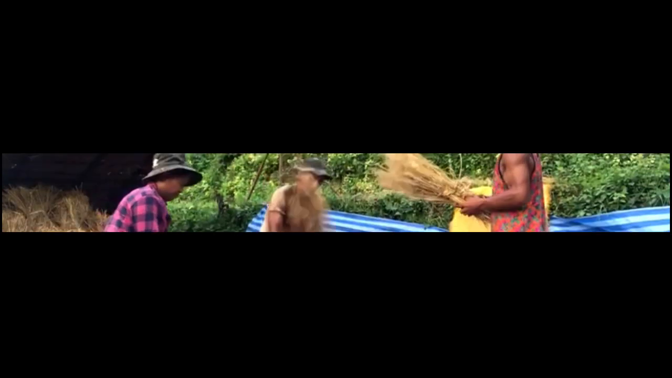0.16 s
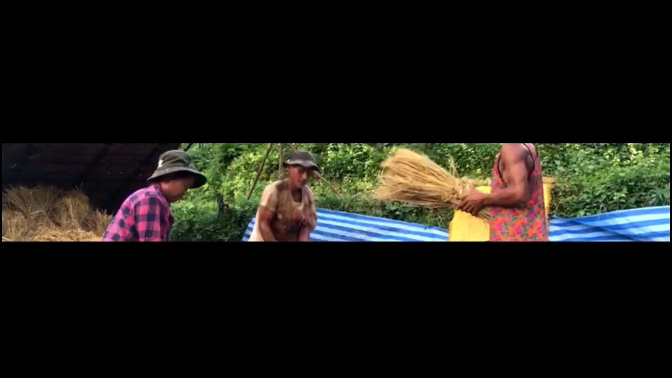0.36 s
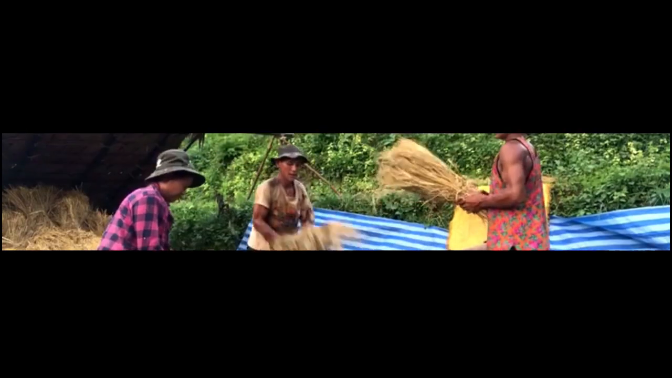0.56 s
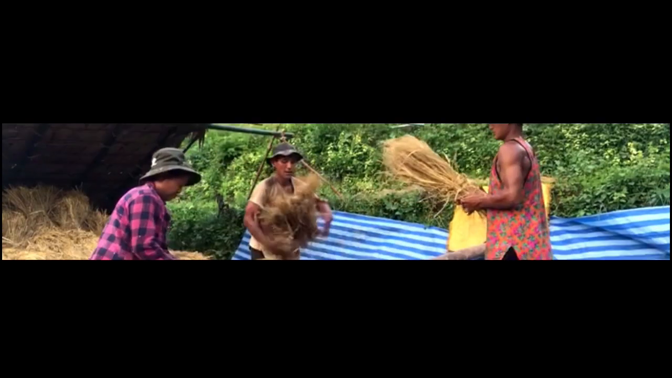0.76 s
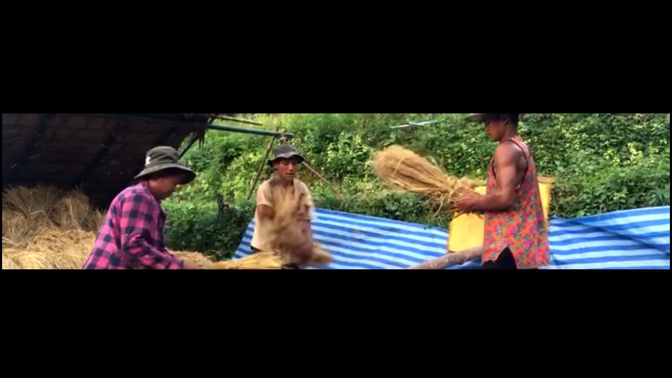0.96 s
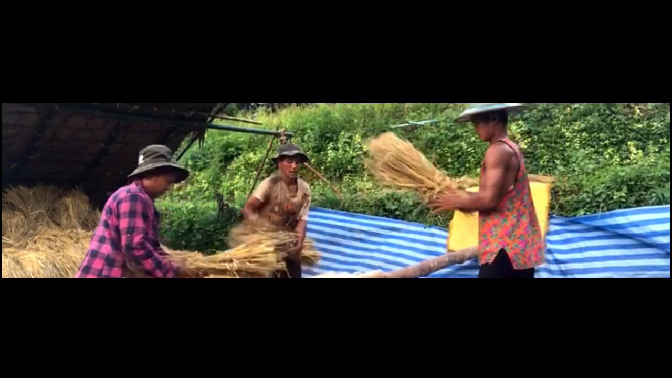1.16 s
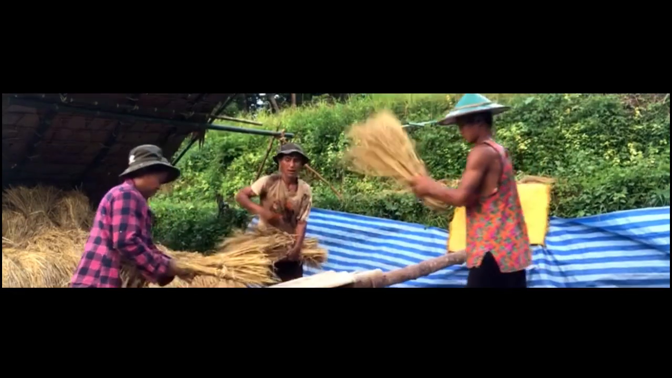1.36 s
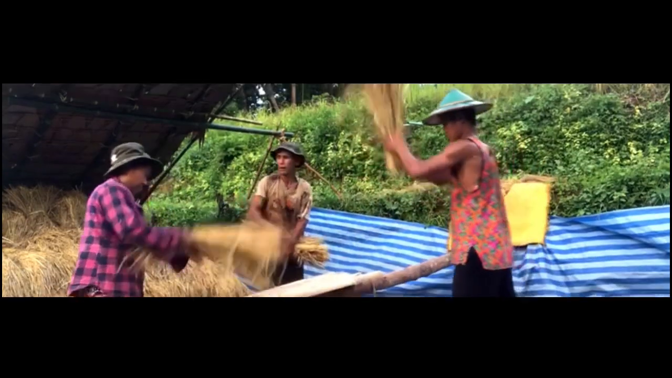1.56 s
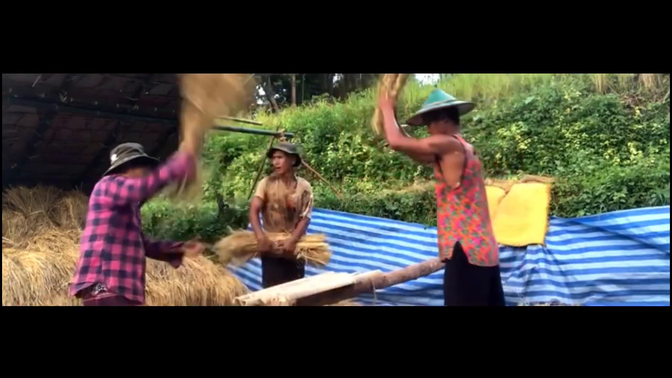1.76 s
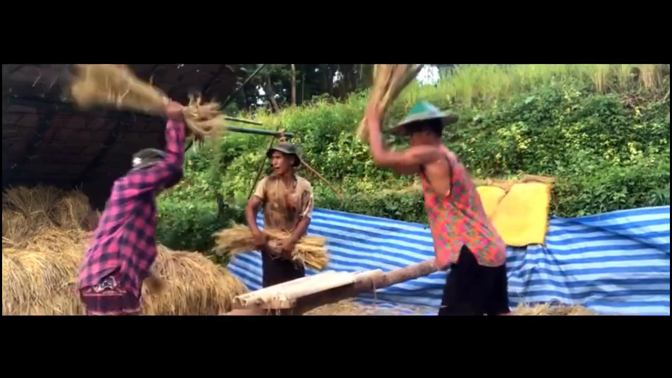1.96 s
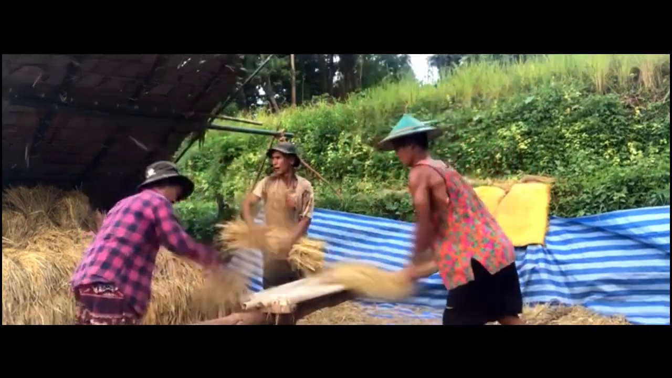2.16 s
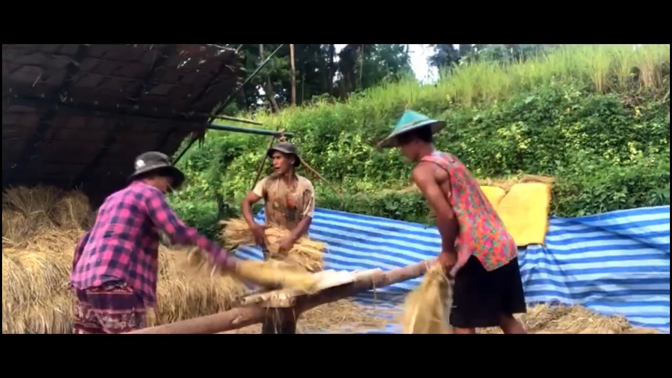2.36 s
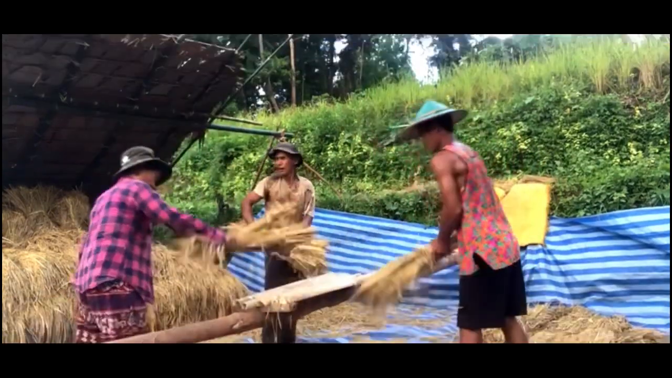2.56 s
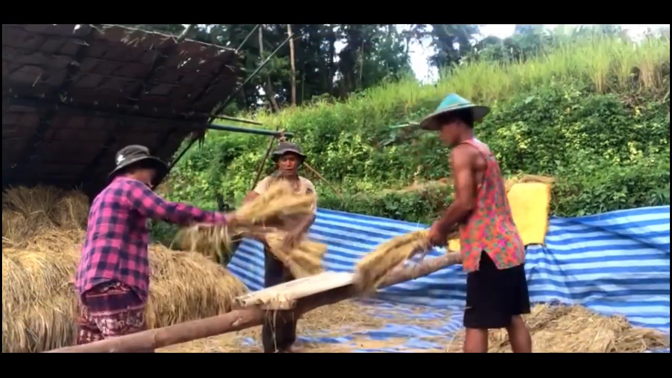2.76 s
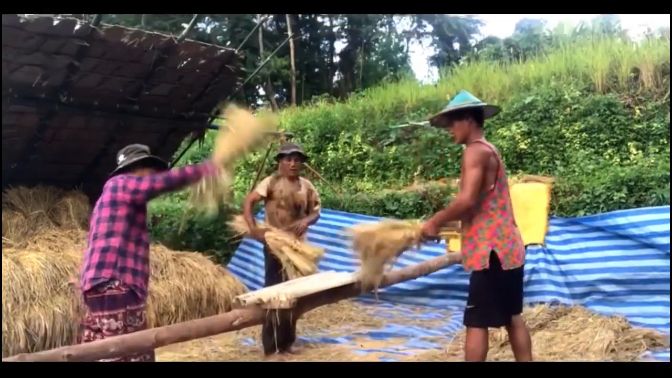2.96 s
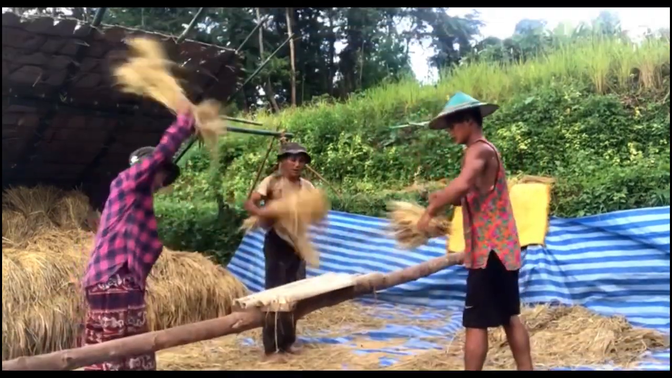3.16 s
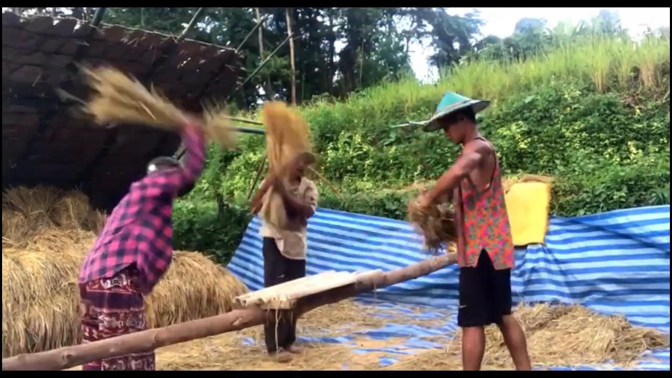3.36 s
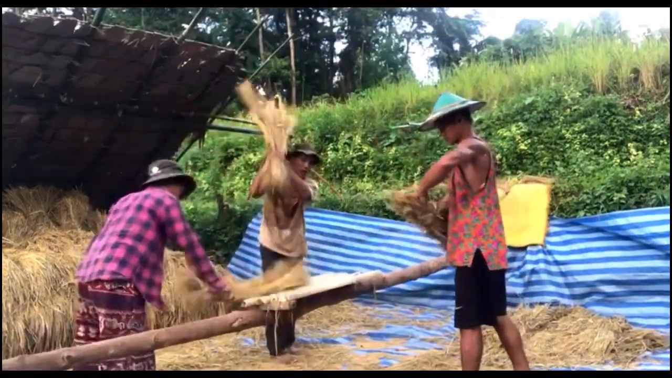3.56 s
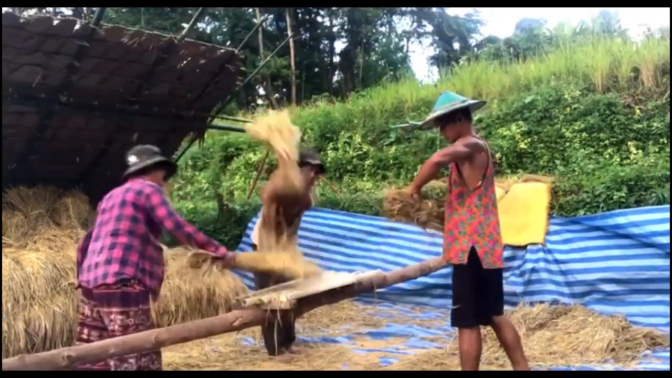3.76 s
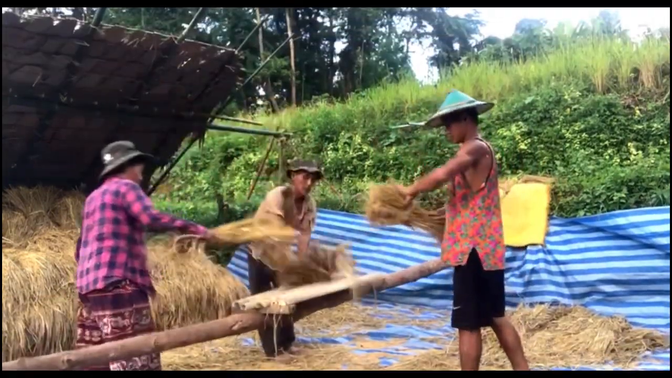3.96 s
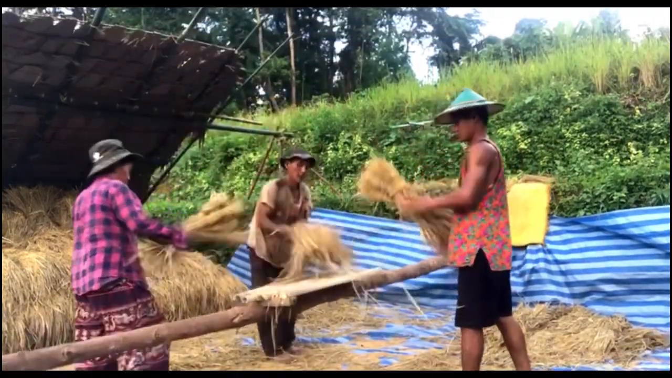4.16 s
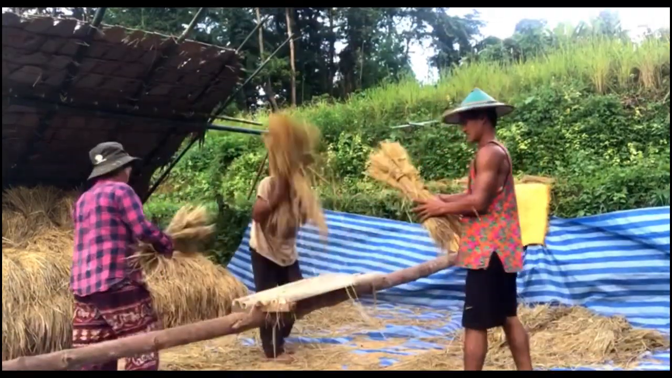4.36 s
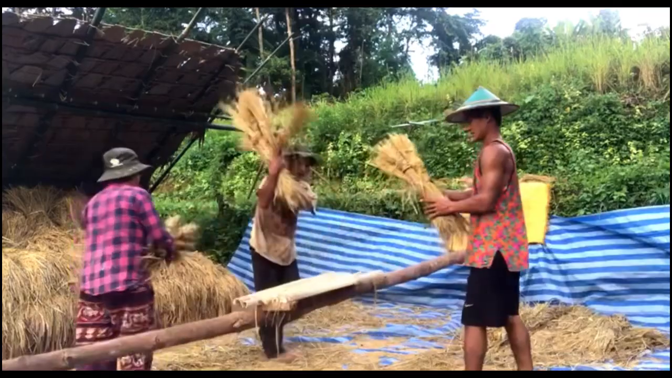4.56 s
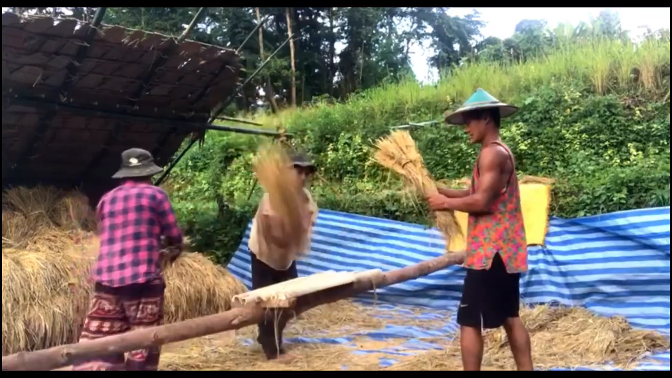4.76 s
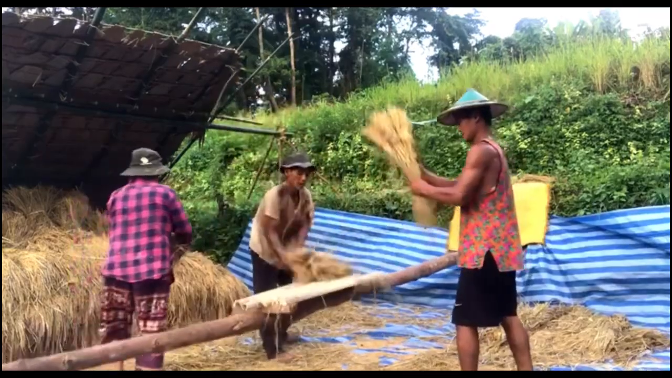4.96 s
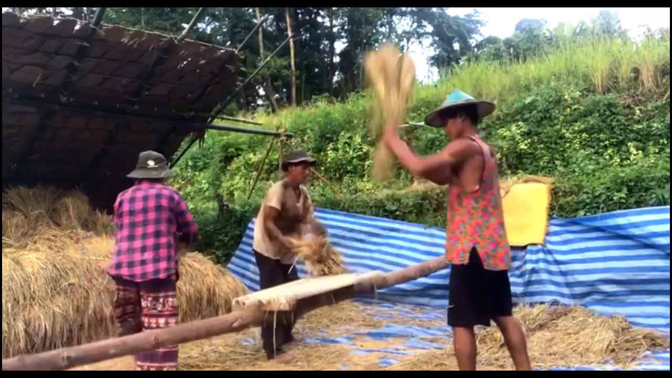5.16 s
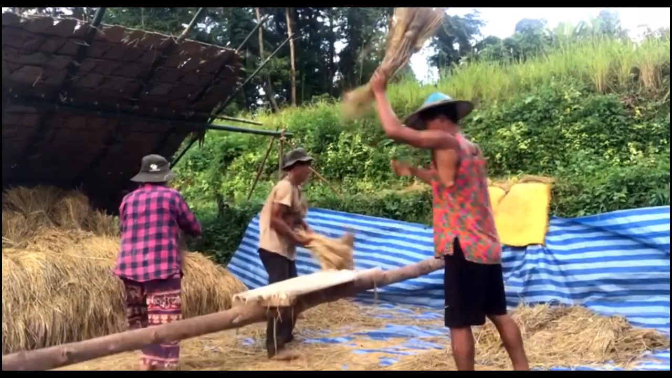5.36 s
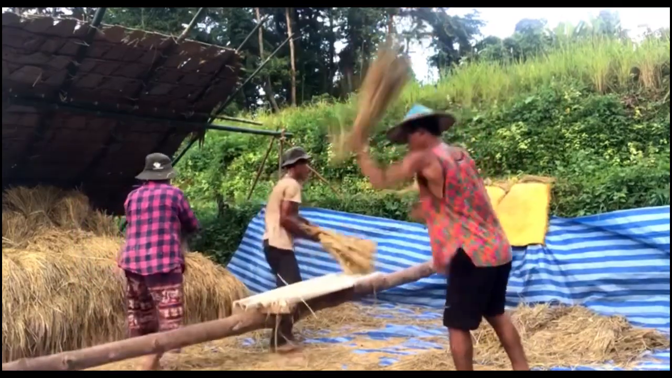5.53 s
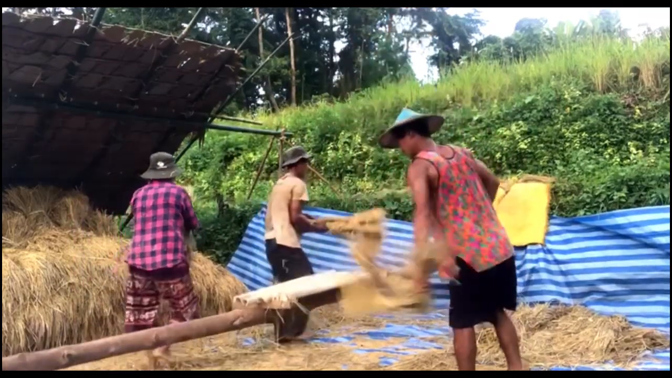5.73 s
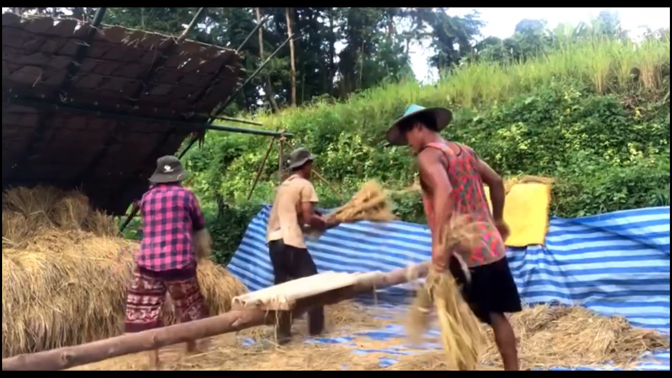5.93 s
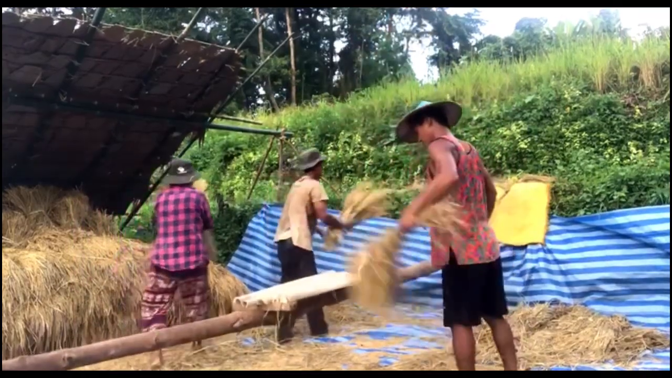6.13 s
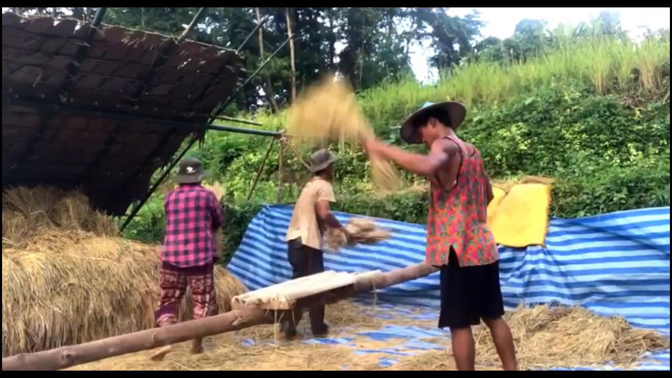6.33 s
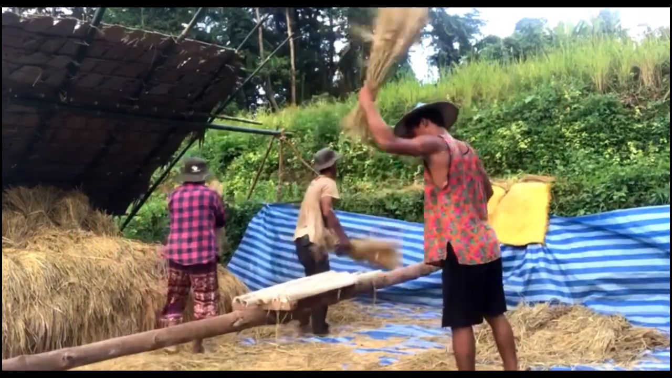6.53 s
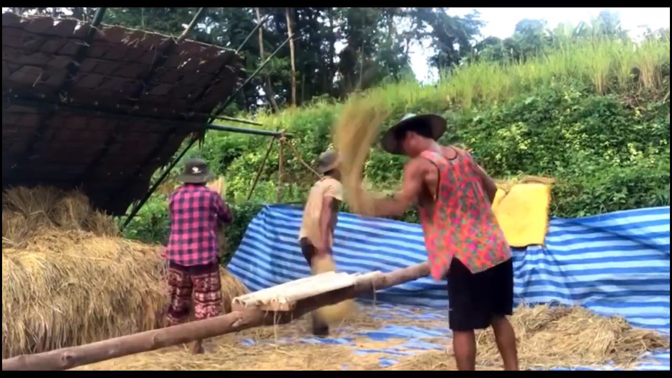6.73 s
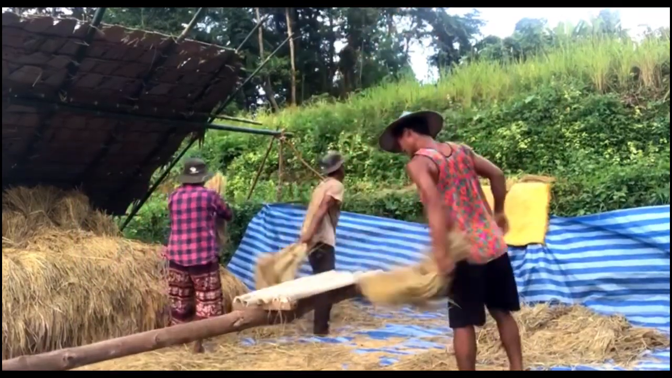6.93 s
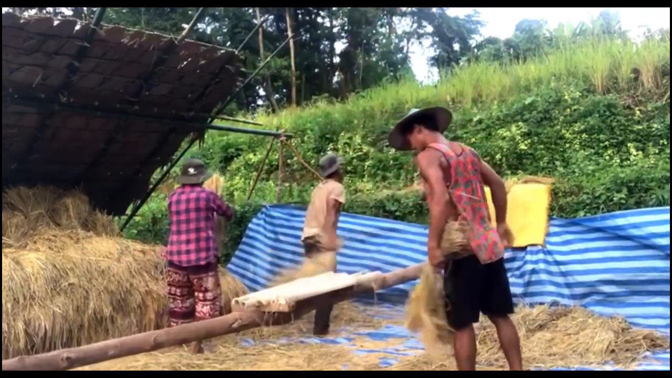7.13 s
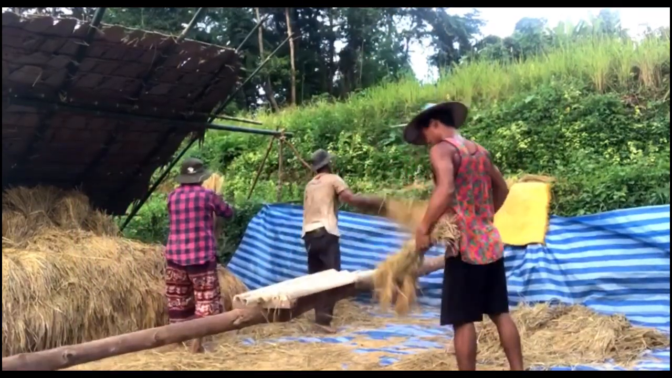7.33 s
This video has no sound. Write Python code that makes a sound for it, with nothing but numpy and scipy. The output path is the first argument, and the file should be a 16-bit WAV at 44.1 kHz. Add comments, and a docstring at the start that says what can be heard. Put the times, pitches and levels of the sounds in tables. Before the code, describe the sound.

Close outdoor phone pickup of hand threshing. Dry bundles of rice straw whack a plank on poles about eight times, unevenly, including a quick pair near two seconds. Each is a bright, splashy slap with a short woody knock, low pole shudder and pattering grain. Straw rustles, crunches and snaps between blows; high insects buzz faintly, with brief distant whistles around three seconds.

```python
"""Beating rice straw by hand

Bundles of rice straw are beaten on a plank laid over poles, in a field a few metres from a phone.
Each blow is a crowd of stalks slapping within milliseconds (noise in bands that fade at their own pace),
then the plank's knock (ringing modes) and the poles' shudder (low noise and one jolt).
Between blows straw rustles and crunches (flickering crackle) and snaps (short rung bursts), insects buzz
at a high pitch, a few faint whistles come from afar and the field hums faintly."""
import sys
import numpy as np
from scipy import signal
from scipy.fft import rfft, irfft, next_fast_len
from scipy.io import wavfile
from scipy.ndimage import uniform_filter1d

SR = 44100
rng = np.random.default_rng(int(sys.argv[2]) if len(sys.argv) > 2 else 0)


def to_wav(sig):
    """Store sig (one row per channel, or 1-D mono) as 16-bit WAV at the path in sys.argv[1].

    Samples outside -1..1 are clipped; the rate is SR.
    """
    pcm = np.clip(np.atleast_2d(sig), -1, 1) * 32767
    pcm = np.round(pcm).astype(np.int16)
    wavfile.write(sys.argv[1], SR, pcm.T)  # frames by channels


def to_linear_factor(level_db):
    """Convert decibel levels (scalar or array-like) to linear amplitude factors."""
    exponent = np.asarray(level_db, float) / 20
    return 10 ** exponent


N = 325878
T = np.arange(N) / SR

# Blows of a bundle on the plank. Each row: start in seconds, level in dB (the first 10 ms lie 8 dB under it
# in rms), treble in dB (-12.5 leaves the slap's colour alone), slap t60 in seconds before each band's
# share, pattering tail in dB relative to the slap.
BLOW_TIMES = [(0.249, -5.5, -10, 0.063, -26.5), (2.1993, -1.5, -8, 0.055, -25),
              (2.2589, -2, -10, 0.053, -27.5), (3.6123, -0.5, -10.5, 0.055, -27),
              (3.9895, -0.5, -12, 0.055, -28), (4.893, -5, -8.5, 0.069, -24.5),
              (5.7138, -1.5, -12, 0.068, -22), (6.2747, -29, -9, 0.042, -17.5),
              (6.877, -3, -11, 0.06, -20.5)]
# How busily the straw is handled. Each row: time in seconds, rustle level in dB before flicker.
HANDLING_LEVELS = [(0, -57), (.12, -47.5), (.45, -53.5), (.65, -49), (1.1, -55), (1.4, -54), (1.7, -52),
                   (1.85, -59), (2.1, -61), (2.35, -47.5), (2.65, -51), (3.1, -53.5), (3.2, -68),
                   (3.5, -80), (3.7, -48.5), (4.05, -48.5), (4.4, -56), (4.8, -51), (5.05, -51), (5.3, -60),
                   (5.6, -62), (5.85, -45), (6.15, -45), (6.25, -54.5), (6.5, -50.5), (6.7, -58.5),
                   (7.0, -49), (7.25, -55), (7.39, -60.5)]


def level(x, db):
    """Scale to an rms level."""
    return x * to_linear_factor(db) / np.sqrt(np.mean(x ** 2))


def read(table, hz, column):
    """A table column read on a log-frequency axis."""
    rows = np.array(table)
    return np.interp(np.log(np.maximum(hz, 1)), np.log(rows[:, 0]), rows[:, column])


def colour(x, table):
    """Give a signal the spectrum of (Hz, dB) points."""
    size = next_fast_len(len(x))
    hz = np.arange(size // 2 + 1) * SR / size
    return irfft(rfft(x, size) * to_linear_factor(read(table, hz, column=1)), size)[:len(x)]


def ring(x, hz, t60):
    """One decaying mode: a complex pole whose imaginary part swings and fades."""
    pole = np.exp(2j * np.pi * hz / SR - np.log(1000) / (t60 * SR))
    return signal.lfilter([1], [1, -pole], x).imag


def band(x, hz, width_hz):
    """Two-pole band-pass."""
    b, a = signal.iirpeak(min(hz, 0.45 * SR), hz / width_hz, SR)
    return signal.lfilter(b, a, x)


def walk(rate):
    """Random levels held 1 / rate seconds and smoothed twice; spread near 1."""
    hold = int(SR / rate)
    steps = np.repeat(rng.standard_normal(N // hold + 1), hold)
    return 1.4 * uniform_filter1d(uniform_filter1d(steps, hold), hold)[:N]


def crackle(length, grit_db):
    """Dense tiny contacts, a few bigger than the rest; rms 1."""
    sizes_db = grit_db * np.minimum(rng.exponential(size=length), 5)
    return level(rng.standard_normal(length) * to_linear_factor(sizes_db), 0)


def add(out, s, sound):
    """Mix a sound in at a time in seconds."""
    i = int(s * SR)
    out[i:i + len(sound)] += sound[:N - i]


def straw():
    """Fine rustle and coarser crunch of bundles handled, swung and shaken, both flickering; powers add."""
    # Bundles swung down through the air. Each row: landing in seconds, swing length in seconds,
    # rustle level at landing in dB.
    swings = [(0.252, 0.069, -42), (2.204, .14, -42), (3.613, 0.17, -42.5), (4.002, 0.087, -37),
              (4.915, 0.23, -46), (5.723, 0.14, -36.5), (6.876, 0.14, -43)]
    # Bundles shaken or turned over. Each row: middle in seconds, length in seconds, rustle level in dB,
    # crunch in dB over that rustle.
    shakes = [(0.76, .2, -48.5, -24), (1.004, 0.066, -42, -10), (1.207, 0.41, -50, -22),
              (1.573, 0.15, -47.5, -23), (2.508, 0.073, -50.5, 6), (4.283, 0.072, -46, -5),
              (4.486, 0.12, -58, 6), (5.167, .06, -55, 5.5), (5.373, 0.045, -51.5, -9),
              (5.842, 0.012, -40, -15), (6.307, 0.11, -43, -12), (6.698, 0.0043, -40.5, -10),
              (7.106, 0.079, -45, -4), (7.318, 0.014, -59, 8)]
    # Colour of the fine rustle. Each row: frequency in Hz, level in dB per Hz (relative).
    rustle_colour = [(880, -21), (1500, -6.5), (4470, -1.5), (4970, -4.5), (6150, 0), (10400, -8),
                     (11200, -5.5), (12100, -20), (12500, -32), (16200, -53), (22000, -120)]
    # Colour of the coarse crunch. Each row: frequency in Hz, level in dB per Hz (relative).
    crunch_colour = [(250, -8), (500, -5), (1100, 1), (2000, -7), (3500, -12)]

    busy_db = np.interp(T, *np.array(HANDLING_LEVELS).T)
    rustle_power = to_linear_factor(busy_db) ** 2
    # crunch lies at -57 dB for a rustle of -50.5 dB and moves 0.51 dB for each dB of rustle
    crunch_power = to_linear_factor(-57 + 0.51 * (busy_db + 50.5)) ** 2

    brush_s, brush_db = 0.016, 7  # time constant; crunch at landing over the swing's rustle
    for s, length, db in swings:
        before = T < s
        rise = np.clip(1 + (T - s) / length, 0, 1) ** 2.3
        rustle_power = rustle_power + before * to_linear_factor(db) ** 2 * rise
        # the longest ears brush the plank just before landing
        brush = to_linear_factor(db + brush_db) * np.exp(np.minimum(T - s, 0) / brush_s)
        crunch_power = crunch_power + before * brush ** 2

    settle_s, settle_db = 0.055, -6  # time constant; start relative to the blow's pattering tail
    for s, db, _, _, tail_db in BLOW_TIMES:
        # the beaten bundle crunches as it settles
        settle = to_linear_factor(db + tail_db + settle_db) * np.exp(-np.maximum(T - s, 0) / settle_s)
        crunch_power = crunch_power + (T > s) * settle ** 2

    for s, length, db, crunch_db in shakes:
        swell = np.exp(-(2 * (T - s) / length) ** 2) ** 2
        rustle_power = rustle_power + to_linear_factor(db) ** 2 * swell
        crunch_power = crunch_power + to_linear_factor(db + crunch_db) ** 2 * swell

    fine = level(colour(crackle(N, grit_db=2.5), rustle_colour), 0)
    fine = fine * to_linear_factor(0.57 * walk(30) + 0.9 * walk(10))
    coarse = level(colour(crackle(N, grit_db=4.0), crunch_colour), 0)
    coarse = coarse * to_linear_factor(1.5 * walk(60) + 1.5 * walk(12))
    return fine * np.sqrt(rustle_power) + coarse * np.sqrt(crunch_power)


def air():
    """Smooth distant air: coloured noise that drifts slowly in level."""
    # Colour of the open field. Each row: frequency in Hz, level in dB per Hz (relative).
    air_colour = [(20, -1), (45, -3.5), (100, -5), (200, -4.5), (400, -9), (1000, -10.5), (3500, -11.5),
                  (6000, -11.5), (11500, -17.5), (12500, -54)]
    return level(colour(rng.standard_normal(N), air_colour), -55) * to_linear_factor(0.7 * walk(3))


def insects():
    """Narrow noise bands that swell together at a steady rate, each also fluttering by itself."""
    # Insect bands. Each row: centre in Hz, width in Hz of each of two filter passes, rms level in dB.
    insect_bands = [(7640, 190, -71), (7820, 190, -64.5), (8160, 140, -70.5)]
    chirr_hz, first_peak_s, chirr_db = 4.63, 0.095, 3.5  # chirr_db: swell either way
    out = np.zeros(N)
    for hz, width_hz, db in insect_bands:
        buzz = band(band(rng.standard_normal(N), hz, width_hz), hz, width_hz)
        chirr = chirr_db * np.cos(2 * np.pi * chirr_hz * (T - first_peak_s))
        flutter = 1.5 * walk(3) + 3.5 * walk(40)
        out = out + level(buzz * to_linear_factor(chirr + flutter), db)
    return out


def whistles():
    """Short far whistles: a wavering tone with its octave, swelling and fading."""
    # Whistles. Each row: start in seconds, length in seconds, mean pitch in Hz, peak of the note in dB,
    # octave in dB over the note.
    chirps = [(2.815, .06, 1690., -57, -3), (2.925, .11, 1670., -55, -8), (3.145, .06, 1490., -58.5, -10)]
    waver = 1 + 0.01 * walk(40)
    out = np.zeros(N)
    for s, length, hz, db, octave_db in chirps:
        phase = 2 * np.pi * np.cumsum(hz * waver) / SR
        swell = np.sin(np.pi * np.clip((T - s) / length, 0, 1))
        out = out + to_linear_factor(db) * swell * (np.sin(phase) + to_linear_factor(octave_db) * np.sin(2 * phase))
    return out


def blow(treble_db, t60, tail_db):
    """Ears land first and bright, the heavy stems follow darker; loose grain patters on."""
    # Colour of the slap. Each row: frequency in Hz, level in dB per Hz (relative).
    slap_colour = [(180, -34), (300, -1.5), (814, -1.5), (1890, -6), (2750, -5.5), (4530, -8.5),
                   (4980, -12), (6390, -9), (7950, -17), (11400, -17), (12500, -31), (16200, -51),
                   (22000, -120)]
    # How the slap spreads in time. Each row: frequency in Hz, arrival lag in seconds,
    # share of the slap t60 as a ratio.
    slap_spread = [(302, 0.0079, 0.77), (1000, 0.0042, 0.91), (2900, 0.00023, 1.11),
                   (11600, 0.000055, 1.19)]
    tail_t60, usual_treble_db = 0.34, -12.5
    contact_s = 0.071 * t60  # the stalks keep landing for this long

    t = T[:SR // 2]
    stalks = colour(crackle(len(t), grit_db=2.5), slap_colour)
    # the pattering comes in uneven clumps a few milliseconds long
    steps = np.repeat(rng.standard_normal(len(t) // 200 + 1), 200)[:len(t)]
    clumps = to_linear_factor(3.7 * uniform_filter1d(steps, size=100))
    out = 0
    for hz in 300 * np.sqrt(2) ** np.arange(11):
        since = np.maximum(t - read(slap_spread, hz, column=1), 0)
        rise = 1 - np.exp(-(since / 0.0018) ** 2)
        after = np.maximum(since - contact_s, 0)
        slap_t60 = t60 * read(slap_spread, hz, column=2)
        slap_fall = clumps ** 0.26 * to_linear_factor(-60 * after / slap_t60)
        # the pattering tail is duller than the slap
        dull_db = 4.0 * max(np.log2(hz / 3500), 0)
        patter = clumps * to_linear_factor(tail_db - dull_db - 60 * after / tail_t60)
        tilt_db = (treble_db - usual_treble_db) * np.clip(np.log2(hz / 2500), -1, 2) / 0.98
        out = out + to_linear_factor(tilt_db) * rise * (slap_fall + patter) * band(stalks, hz, 0.5 * hz)
    return to_linear_factor(-8.0) * out / np.sqrt(np.mean(out[:SR // 100] ** 2))


def shudder(t, pulse, shudder_db):
    """The loose poles jolt once, then go on shaking, low and rough."""
    # Colour of the shaking. Each row: frequency in Hz, level in dB per Hz (relative).
    shudder_colour = [(25, -22), (45, -5.5), (60, 1.5), (90, -20.5), (140, -8.5), (250, -39.5)]
    thump_hz, thump_t60, thump_lag_s, thump_db = 70.6, 0.08, 0.0059, 19.5  # thump_db: peak over shudder_db
    shaking = level(colour(rng.standard_normal(len(t)), shudder_colour), shudder_db)
    shaking = shaking * (1 - np.exp(-t / 0.007)) * to_linear_factor(-60 * t / 0.95)
    late_pulse = np.interp(t - thump_lag_s, t, pulse)
    thump = ring(np.gradient(late_pulse), thump_hz, thump_t60)
    return shaking + to_linear_factor(shudder_db + thump_db) * thump / np.abs(thump).max()


def knock(low_hz, high_hz, high_db, shudder_db):
    """An uneven push rings the plank; modes far in pitch from the struck spot's own are driven less."""
    # Low modes of the plank. Each row: frequency in Hz, t60 in seconds.
    low_modes = [(115, 0.13), (145, 0.14), (190, 0.069), (235, 0.085), (275, 0.039), (350, 0.064),
                 (430, 0.018)]
    # High modes of the plank. Each row: frequency in Hz, t60 in seconds.
    high_modes = [(630, 0.017), (700, 0.034), (815, 0.032), (915, 0.058), (1240, 0.024), (1370, 0.078),
                  (1530, 0.018), (1690, 0.043)]
    lag_s = 0.0037  # the knock comes after the first slap
    t = np.maximum(T[:SR // 2] - lag_s, 0)
    pulse = t * np.exp(-t / 0.0031)
    pulse = pulse / pulse.sum()
    push = pulse * rng.standard_normal(len(t))
    # the springy straw pulls back as much as it pushes
    balanced_push = push - push.sum() * pulse
    low = 0
    for hz, t60 in low_modes:
        mode = ring(balanced_push, hz, t60)
        octaves_off = np.log2(hz / low_hz)
        low = low + mode / np.abs(mode).max() / (1 + (octaves_off / 0.26) ** 2)
    high = 0
    for hz, t60 in high_modes:
        octaves_off = np.log2(hz / high_hz)
        high = high + ring(push, hz, t60) / (1 + (octaves_off / 0.045) ** 2)
    plank = low / np.abs(low).max() + to_linear_factor(high_db) * high / np.abs(high).max()
    return to_linear_factor(2.0) * plank + shudder(t, pulse, shudder_db)


def snap(hz, treble_db):
    """A stalk cracks a few times within a millisecond or two, rings for a cycle or so and crushes on."""
    t = T[:SR // 10]
    burst = crackle(len(t), grit_db=2.5) * (t / 0.0005) ** 2 * np.exp(-t / 0.00047)
    crush = to_linear_factor(-28) * crackle(len(t), grit_db=3.0) * np.exp(-t / 0.019)
    cracks = burst / np.abs(burst).max() + crush
    # dull snaps ring longer: 0.17 dB more ring time for each dB less treble
    ring_t60 = max(0.0049 * to_linear_factor(-0.17 * treble_db), 0.002)
    body = np.diff(ring(cracks, hz, ring_t60), prepend=0)
    edge = band(band(cracks, 2400.0, 2400.0), 2400.0, 2400.0)
    both = body / np.abs(body).max() + to_linear_factor(treble_db) * edge / np.abs(edge).max()
    return both / np.abs(both).max()


def add_faint_snaps(out):
    """Faint snaps at random moments, louder where the straw is handled more busily."""
    count, usual_db = 45, 9  # usual_db: usual peak over the handling rustle of the moment
    for when, size, pitch, edge in rng.random((count, 4)):
        s = when * T[-1]
        busy_db = np.interp(s, *np.array(HANDLING_LEVELS).T)
        peak_db = busy_db + usual_db + 8 * (size - 0.5)
        add(out, s, to_linear_factor(peak_db) * snap(900 * 2.5 ** pitch, -12 * edge))


def scene():
    """Blows with their knocks and the snaps at their moments, over straw, field and faint chance snaps."""
    # The plank's answer, one row for each blow. Each row: level in dB (the low modes peak 2 dB over it),
    # low pitch nearest the struck spot in Hz, high pitch in Hz, high modes in dB over the low ones,
    # the poles' shudder in dB relative to the row's level, before its rise and fade.
    plank_answers = [(-13.5, 220, 1570, 2, -30.5), (-17, 265, 750, 7.5, -29), (-12, 274, 1100, 0, -39),
                     (-15, 280, 950, -4.5, -30.5), (-8.5, 375, 560, -3, -36.5),
                     (-18.5, 308, 1556, 12, -33.5), (-8.5, 187, 810, -0.5, -36.5), (-41, 168, 900, -5, -25),
                     (-16, 230, 1710, -2.5, -31)]
    # Snapping stalks and late slaps. Each row: start in seconds, peak in dB, ring in Hz,
    # treble in dB over the ring.
    snap_times = [(0.276, -16.5, 1350, 10), (0.296, -26, 1220, 1), (0.375, -22.5, 1750, -20),
                  (0.458, -27, 1450, -9), (0.559, -27.5, 1540, -11), (0.598, -27, 1030, -15),
                  (0.798, -31.5, 2230, 0), (0.828, -31.5, 1160, -6), (2.556, -28, 1740, -4),
                  (2.598, -34, 1460, -4), (4.073, -36, 1960, -5), (4.136, -21.5, 1150, -3.5),
                  (4.16, -24, 1790, 3), (4.174, -35, 2100, -2), (4.197, -27, 1180, -11),
                  (4.216, -32, 1360, -5), (4.248, -22.5, 2040, 2), (4.276, -20, 1080, -4.5),
                  (4.346, -27.5, 2200, -4), (4.371, -29, 1280, -10), (4.45, -28, 1080, -5),
                  (4.453, -22, 1290, -7), (4.457, -31, 1000, 3), (4.461, -27, 930, -7),
                  (4.472, -18, 1200, 0), (4.506, -32, 1600, -15), (4.519, -25.5, 1740, -15),
                  (4.552, -32, 1680, -10), (4.576, -34, 1470, -7), (4.612, -32.5, 1030, -8),
                  (4.627, -34, 2300, -2), (4.695, -36, 1080, -25), (4.795, -33.5, 1060, -13),
                  (5.048, -36.5, 1820, -5), (5.075, -37, 795, -3), (5.176, -31, 2260, 5),
                  (5.233, -32, 790, -3.5), (5.469, -34.5, 1500, -6), (5.5, -29.5, 1094, -21),
                  (5.763, -27, 1550, -9), (5.77, -20, 1270, -6), (5.838, -40, 877, -11),
                  (6.255, -32.5, 1510, 9), (6.327, -30.5, 1150, -21), (6.413, -31, 1400, 2),
                  (6.649, -27.5, 1330, -13), (6.665, -30.5, 1040, -6), (6.692, -27.5, 1020, -2),
                  (6.776, -28.5, 1710, -5), (6.788, -29.5, 2430, 4), (6.829, -31, 2400, -3),
                  (6.866, -25, 2200, 0), (6.895, -9.5, 1000, 4), (6.94, -23, 2000, -3),
                  (6.947, -24, 1500, 0), (6.986, -35, 2010, -7), (7.089, -24, 1590, -2),
                  (7.238, -27, 1500, -14), (7.306, -27.5, 2380, 0), (7.367, -37, 1200, -7)]
    out = straw() + air() + insects() + whistles()
    for (s, db, *slap), (knock_db, *plank) in zip(BLOW_TIMES, plank_answers):
        add(out, s, to_linear_factor(db) * blow(*slap) + to_linear_factor(knock_db) * knock(*plank))
    for s, db, hz, treble_db in snap_times:
        add(out, s, to_linear_factor(db) * snap(hz, treble_db))
    add_faint_snaps(out)
    return out[None]


def band_limit(x):
    """A steep low-pass at the top of the band."""
    return signal.sosfilt(signal.butter(12, 12680, fs=SR, output="sos"), x)


def record(dry):
    """The phone loses the deepest bass, rounds the loudest peaks and cuts the top."""
    bass_cut = signal.butter(2, 55, "high", fs=SR, output="sos")
    top_cut = signal.ellip(10, 0.3, 60, 12350, fs=SR, output="sos")
    rounded = np.tanh(1.15 * signal.sosfilt(bass_cut, dry)) / 1.15
    return band_limit(signal.sosfilt(top_cut, rounded))


dry = scene()
out = record(dry)
to_wav(out)
```